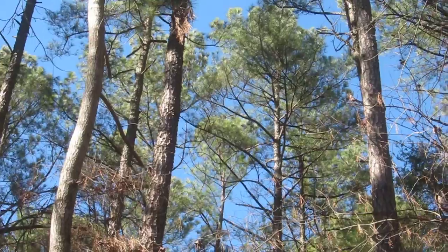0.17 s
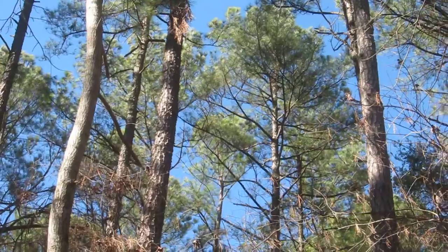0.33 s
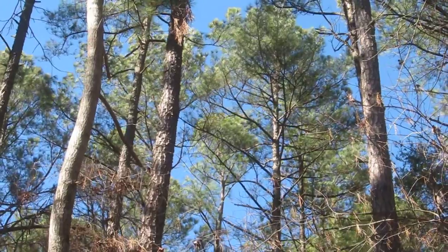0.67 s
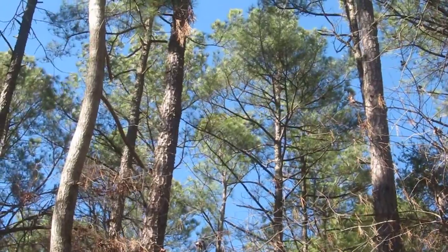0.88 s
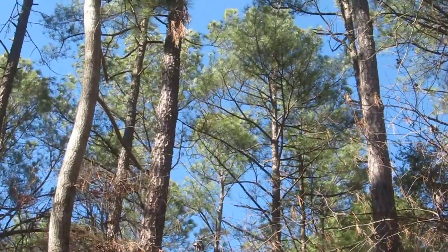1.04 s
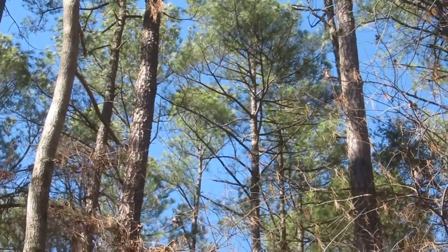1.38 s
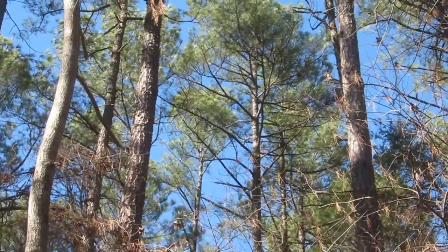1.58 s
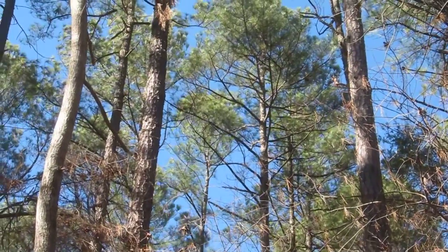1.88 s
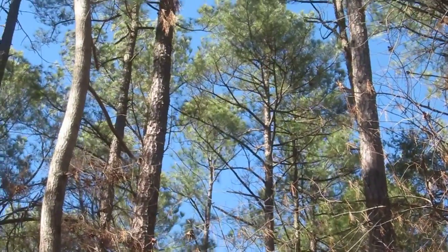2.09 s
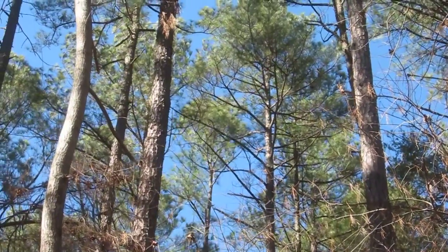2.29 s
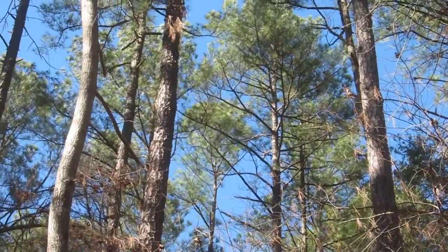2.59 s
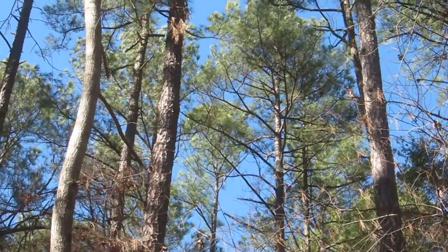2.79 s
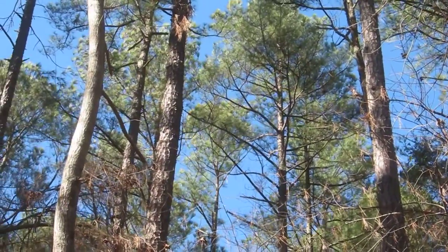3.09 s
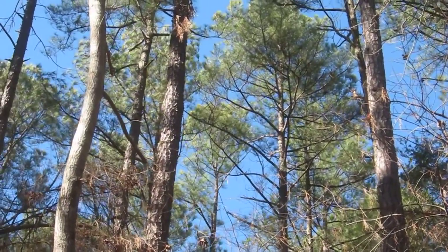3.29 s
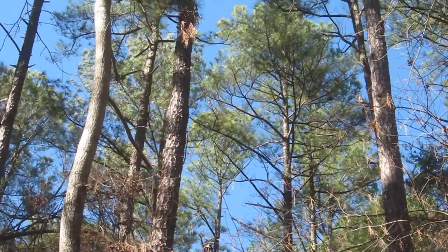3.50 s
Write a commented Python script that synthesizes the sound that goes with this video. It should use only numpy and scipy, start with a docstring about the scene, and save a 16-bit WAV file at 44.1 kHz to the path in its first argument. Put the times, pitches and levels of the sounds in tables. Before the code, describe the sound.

Steady wind rushes through pine crowns with low rumble and faint needle hiss, starting after a tiny silence and rising until 1.3 s. A thin high whistle sounds at 0.65-1.0 s, then a wavering, falling one until 1.75. Dry twigs tick at 1.3-1.55, sharpest at 1.43. Five faint far calls follow from 1.57 to 2.15, a chip at 2.46, a tick at 2.76, another whistle at 3.6. Very faint camera whines persist.

```python
"""After a very short silence, steady wind in tall pine crowns is heard over a low rumble, with two thin whines.
The level of wind and whines rises for about a second. The wind is noise shaped by frequency.
A songbird's thin whistles are sines that follow drawn pitch curves; another bird chips once, a far one calls
in a row, and dry twigs tick as short ringing tones with noise. The trunks echo birds and twigs with fading noise.
The camera's whines are narrow noise, and a narrow band near 8 kHz is nearly silent."""
import sys
import numpy as np
from scipy import signal
from scipy.fft import rfft, irfft, next_fast_len
from scipy.io import wavfile
from scipy.ndimage import uniform_filter1d, map_coordinates

SR = 44100
rng = np.random.default_rng(int(sys.argv[2]) if len(sys.argv) > 2 else 0)


def put_to_file(sound):
    """Save the sound as 16-bit audio at rate SR, in the file named by the first command-line argument."""
    columns = np.atleast_2d(sound).T  # one column per channel
    safe = np.clip(columns, -1, 1)
    whole_steps = np.round(safe * 32767)
    wavfile.write(sys.argv[1], SR, whole_steps.astype(np.int16))


N = 160524
T = np.arange(N) / SR  # time of every sample [s]

# How the background level rises: (time [s], background level [dB])
BACKGROUND_FADE_IN = [(0.04, -49.5), (1.3, -43), (3.64, -43.5)]
# Tone colour of the low rumble, before scaling: (frequency [Hz], level per Hz [dB])
RUMBLE_COLOUR = [(15, -40), (25, -5.5), (45, -5), (75, 3.5), (180, -14.5), (230, -40), (400, -120)]
# Tone colour of the roaring crowns, before scaling: (frequency [Hz], level per Hz [dB])
CROWN_COLOUR = [(76, -11), (130, -4.5), (177, -5.5), (245, -2), (291, -4.5), (462, -1), (1090, -4),
                (2310, -14.5), (6460, -24.5), (7800, -32.5), (10100, -55), (17200, -120)]
# Tone colour of the hissing needles, before scaling: (frequency [Hz], level per Hz [dB])
NEEDLE_COLOUR = [(5240, -53), (8900, -3), (10400, -0.5), (11300, -1.5), (11800, -2), (14600, -9),
                 (15600, -16)]
# How alike the wind is in both ears: (frequency [Hz], likeness [0 to 1])
EAR_LIKENESS = [(30, 0.76), (60, 1), (130, 0.67), (290, 0.75), (640, 0.93), (1400, 0.59), (3100, 0.19),
                (6800, .03), (15000, .05)]
# How the wind leans to one side: (frequency [Hz], left over right [dB])
WIND_LEAN = [(60, 0.9), (700, 1.2), (2400, -1), (5000, 0), (9000, -1), (15000, -2.2)]
# The songbird's high whistles, one list each: (time [s], pitch [Hz], level [dB], left over right [dB])
HIGH_WHISTLES = [
    [(0.648, 6590, -64, 0), (0.682, 6750, -53, -1), (0.715, 6600, -51, -1), (0.75, 6598, -49.5, 0),
     (0.785, 6597, -51.5, 6), (0.815, 6610, -52, -1), (0.83, 6540, -52, 5), (0.85, 6598, -50, -5),
     (0.905, 6590, -53, 6), (0.965, 6598, -53.5, -4), (0.985, 6600, -65, -4), (1.015, 6600, -59, 0),
     (1.03, 6596, -68, 0)],
    [(3.585, 6490, -62, 0), (3.591, 6606, -54, 0), (3.64, 6680, -56, 0)],
]
# The songbird's long falling whistle: (time [s], pitch [Hz], level [dB], left over right [dB])
LOW_WHISTLE = [(0.99, 4190, -62, 0), (1.005, 4140, -50, 0), (1.048, 3945, -45.5, -5), (1.1, 3905, -50, -4),
               (1.145, 3880, -45.5, -4), (1.213, 3845, -43.5, -2), (1.222, 3840, -66, 0),
               (1.265, 3830, -58, -3), (1.295, 3810, -50, -4), (1.34, 3775, -44, 0),
               (1.39, 3768, -48.5, -1), (1.43, 3762, -53, 6), (1.475, 3760, -47.5, 3),
               (1.505, 3742, -49, -4), (1.53, 3732, -45, 1), (1.615, 3728, -44.5, 4), (1.645, 3722, -52, 0),
               (1.68, 3722, -51, 10), (1.742, 3715, -58, -3)]
# Calls of the far bird: (start [s], level [dB])
FAR_BIRD_CALLS = [(1.568, -59.5), (1.7, -60), (1.83, -58.5), (1.968, -58), (2.102, -58.5)]
# Twig ticks: (start [s], level [dB], pitch [Hz], left over right [dB],
#              crack within the tick [dB], branch body within the tick [dB])
TWIG_TICKS = [(1.3136, -48, 11000, 1, 5, -22), (1.3694, -47, 4600, 1, 10, -6),
              (1.378, -40.5, 5130, -1, -14, -30), (1.4322, -21.5, 4960, -0.5, -12, -3.5),
              (1.468, -40, 4250, 3, -30, -30), (1.5341, -54, 6000, -8, 10, -23),
              (1.537, -48, 13030, -3, -5, -30), (2.7625, -38.5, 10300, 5, -14, -21)]
# Ringing modes of a twig: (pitch ratio [times the tick's pitch], level [dB])
TWIG_MODES = [(1, 2), (1.19, -2.5), (1.42, -8), (2.0, -25), (2.2, -16), (2.42, -15.5)]
# Ringing modes of the branch behind it: (frequency [Hz], level before the tick's body setting [dB])
BRANCH_MODES = [(1150, -5), (1800, 2), (3100, 0), (4200, -1)]
# Camera whines: (pitch [Hz], width [Hz], level over the background [dB], left over right [dB])
CAMERA_WHINES = [(8816, 28, -34, 0), (10990, 120, -38, -26.5)]
# How long the trunks echo: (frequency [Hz], time to fall by 60 dB [s])
FOREST_FADE = [(2000, .6), (4500, .8), (7000, 1.1), (9000, .6)]

CROWNS_DB, RUMBLE_DB = 1.5, -1.5  # over the background level
NEEDLES_DB = -20.5  # over the background level at its end
NEEDLES_FADE_SHARE = 0.69  # dB of change in the hiss for each dB of change in the background
LUMP_DB, LUMP_RATE = .8, 12  # the rumble comes in lumps: size [dB], knots per second

WAVER_DB, WAVER_HZ, WAVER_RATE = 2.5, 9, 130  # whistle waver: level, pitch, knots per second
DRIFT_DB, DRIFT_RATE = 1.5, 30  # the whistle drifts between the ears: size [dB], knots per second
BIRD_LAG_S, LAG_DRIFT_S = .000053, .000008  # the left ear hears the songbird later by about this much

CHIP_S, CHIP_LEN_S = 2.463, .025
CHIP_FROM_HZ, CHIP_TO_HZ = 7250, 2650
CHIP_DB, CHIP_FADE_DB = -53.5, -2  # start level, change by the end
FAR_LEN_S, FAR_HZ, FAR_DROP_HZ = .058, 2345, 130
FAR_BLUR_DB, FAR_BLUR_HZ, FAR_BLUR_RATE = 2, 40, 130  # ragged after the long way through the wind

TICK_T60_S, TICK_RISE_S = .0075, .0002  # time to fall by 60 dB, time constant of the onset
TICK_LEAD_S = .00002  # the ringing is this far ahead in the right ear

BIRD_ECHO_DB, CHIP_ECHO_DB, FAR_ECHO_DB, TICK_ECHO_DB = -10, 8, -6, -39  # forest echo gains

DIP_HZ, DIP_WIDTH_HZ, DIP_DB = 8160, 254, -37
START_S, TOP_HZ = .0362, 15700  # end of the silence, highest frequency kept


def amp(db):
    """Turn dB into gain."""
    return 10 ** (np.asarray(db) / 20)


def unit(x):
    """Scale a signal to an average strength (rms) of 1."""
    return x / np.sqrt(np.mean(x ** 2) + 1e-20)


def along(points, hz):
    """Read a curve of (frequency, value) points along a log frequency axis."""
    f, v = np.transpose(points)
    return np.interp(np.log(hz + 1), np.log(f + 1), v)


def curves(rows):
    """Draw one curve over time for each column after the time."""
    s, *cols = np.transpose(rows)
    return [np.interp(T, s, c) for c in cols]


def wobble(rate):
    """Make a smooth random curve through `rate` random knots a second."""
    knots = rng.standard_normal(int(N * rate / SR) + 4)
    return map_coordinates(knots, [T * rate])


def filtered(x, response):
    """Multiply the spectrum of x by a gain that depends on frequency."""
    m = next_fast_len(N + SR // 2)
    spectrum = rfft(x, m) * response(np.fft.rfftfreq(m, 1 / SR))
    return irfft(spectrum, m)[..., :N]


def placed(x, lean_db):
    """Place a mono sound left or right by making one ear louder than the other."""
    return np.array([x * amp(lean_db / 2), x * amp(-lean_db / 2)])


def window(start, length, edge):
    """Open and close a sound softly in time (all in seconds)."""
    to_nearest_end = np.minimum(T - start, start + length - T)
    return np.sin(np.pi / 2 * np.clip(to_nearest_end / edge, 0, 1)) ** 2


def tone(hz, phase=0):
    """Make a sine of rms 1 that follows a pitch curve."""
    return np.sqrt(2) * np.sin(2 * np.pi * np.cumsum(hz) / SR + phase)


def rush(colour, patchy_db):
    """Stereo noise of rms 1, louder and softer in random patches of time and frequency."""
    z = signal.stft(rng.standard_normal((2, N)), nperseg=512)[2]
    patches = uniform_filter1d(rng.standard_normal(z.shape[1:]), size=5, axis=0)
    patches = uniform_filter1d(patches, size=8, axis=1)
    pair = signal.istft(z * amp(patchy_db * unit(patches)), nperseg=512)[1][:, :N]

    def mid_side_gain(hz):
        """Share the noise between mid and side so the ears get the wanted likeness."""
        turn = np.arccos(np.clip(along(EAR_LIKENESS, hz), -1, 1)) / 2
        return amp(along(colour, hz)) * [np.cos(turn), np.sin(turn)]

    mid, side = filtered(pair, mid_side_gain)
    ears = np.array([mid + side, mid - side])
    return unit(filtered(ears, lambda hz: placed(1, along(WIND_LEAN, hz))))


def forest(x, echo_db):
    """The trunks scatter a sound back as fading noise, differently to each ear."""
    hz, t, z = signal.stft(rng.standard_normal((2, SR // 2)), SR, nperseg=256)
    fade = amp(-60 * t / along(FOREST_FADE, hz)[:, None])
    tail = signal.istft(z * fade, SR, nperseg=256)[1]
    delayed = np.pad(x.mean(0), (400, 0))[None]  # 400 samples, about 9 ms
    echo = signal.fftconvolve(delayed, tail / np.linalg.norm(tail[0]), axes=1)[:, :N]
    return x + amp(echo_db) * echo


def wind():
    """Crowns roar, needles hiss and the air rumbles: three colours of noise."""
    level_db, = curves(BACKGROUND_FADE_IN)
    gust_db = 0.14 * wobble(2.64) + 0.37 * wobble(8.58)
    crowns = amp(level_db + CROWNS_DB + gust_db) * rush(CROWN_COLOUR, patchy_db=0.6)
    end_db = level_db[-1]
    hiss_db = NEEDLES_DB + end_db + NEEDLES_FADE_SHARE * (level_db - end_db)
    needles = amp(hiss_db + gust_db) * rush(NEEDLE_COLOUR, patchy_db=-0.5)
    lumps_db = LUMP_DB * wobble(LUMP_RATE)
    rumble = amp(level_db + RUMBLE_DB + lumps_db) * rush(RUMBLE_COLOUR, patchy_db=-0.1)
    return crowns + needles + rumble


def songbird():
    """Thin pure whistles that waver on their way through the branches."""
    song = np.zeros((2, N))
    for rows in [*HIGH_WHISTLES, LOW_WHISTLE]:
        hz, db, lean_db = curves(rows)
        start, end = rows[0][0], rows[-1][0]
        gate = window(start, end - start, 0.0039)
        lag_s = BIRD_LAG_S + LAG_DRIFT_S * wobble(DRIFT_RATE)
        ear_phase = np.array([[-1], [1]]) * np.pi * hz * lag_s  # half the lag in each ear
        loudness = gate * amp(db + WAVER_DB * wobble(WAVER_RATE))
        level = placed(loudness, lean_db + DRIFT_DB * wobble(DRIFT_RATE))
        song += level * tone(hz + WAVER_HZ * wobble(WAVER_RATE), ear_phase)
    return forest(song, BIRD_ECHO_DB)


def chipping_bird():
    """One chip: a sine whose pitch falls steeply."""
    u = np.clip((T - CHIP_S) / CHIP_LEN_S, 0, 1)  # progress from 0 to 1
    fall = np.sin(np.pi / 2 * u) ** 2
    pitch_hz = CHIP_FROM_HZ * (CHIP_TO_HZ / CHIP_FROM_HZ) ** fall
    level = amp(CHIP_DB + CHIP_FADE_DB * u) * window(CHIP_S, CHIP_LEN_S, 0.0026)
    return forest(placed(level * tone(pitch_hz), 0), CHIP_ECHO_DB)


def far_bird():
    """A row of short drooping sines, blurred in level and pitch."""
    calls = np.zeros(N)
    blur_db = FAR_BLUR_DB * wobble(FAR_BLUR_RATE)
    blur_hz = FAR_BLUR_HZ * wobble(FAR_BLUR_RATE)
    for s, db in FAR_BIRD_CALLS:
        droop = np.clip((T - s) / FAR_LEN_S, 0, 1) ** 2
        pitch_hz = FAR_HZ - FAR_DROP_HZ * droop + blur_hz
        calls += amp(db + blur_db) * window(s, FAR_LEN_S, 0.0065) * tone(pitch_hz)
    return forest(placed(calls, 0), FAR_ECHO_DB)


def twigs():
    """Dry ticks: quickly damped modes of twig and branch, with a crack of noise."""
    out = np.zeros((2, N + SR))
    t = np.arange(SR // 50) / SR
    ear_t = t + np.array([[0], [TICK_LEAD_S]])
    shape = amp(-60 * t / TICK_T60_S) * (1 - np.exp(-t / TICK_RISE_S))
    for s, db, hz, lean_db, crack_db, body_db in TWIG_TICKS:
        modes = [(hz * ratio, level) for ratio, level in TWIG_MODES]
        modes += [(f, level + body_db) for f, level in BRANCH_MODES]
        ring = np.zeros((2, len(t)))
        for k, (f, level) in enumerate(modes):
            if f < TOP_HZ:
                ring += (-1) ** k * amp(level) * np.sin(2 * np.pi * f * ear_t)  # signs alternate
        crack = amp(crack_db) * rng.standard_normal((2, len(t)))
        first = round(s * SR)
        out[:, first:first + len(t)] += placed(amp(db) * shape, lean_db) * (ring + crack)
    return forest(out[:, :N], TICK_ECHO_DB)


def camera():
    """Narrow, slightly fuzzy whines of the camera's own works: noise through sharp resonances."""
    level_db, = curves(BACKGROUND_FADE_IN)
    out = np.zeros((2, N))
    for pitch_hz, width_hz, db, lean_db in CAMERA_WHINES:
        resonance = lambda hz: 1 / (1 + ((hz - pitch_hz) / width_hz * 2) ** 2)
        whine = unit(filtered(rng.standard_normal(N), resonance))
        out += placed(amp(level_db + db) * whine, lean_db)
    return out


def scene():
    """Add up wind, birds, twigs and camera whines."""
    return wind() + songbird() + chipping_bird() + far_bird() + twigs() + camera()


def record(dry):
    """A deep narrow dip near 8 kHz, then the silent lead-in and the upper frequency limit."""
    dip = lambda hz: amp(DIP_DB * np.exp(-((hz - DIP_HZ) / DIP_WIDTH_HZ) ** 2))
    started = filtered(dry, dip) * (T > START_S)
    return filtered(started, lambda hz: hz < TOP_HZ)


dry = scene()
out = record(dry)
put_to_file(out)
```